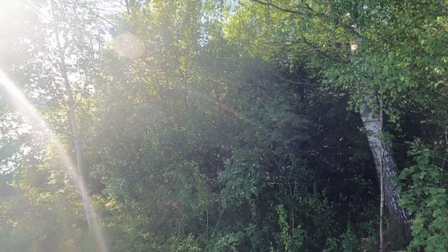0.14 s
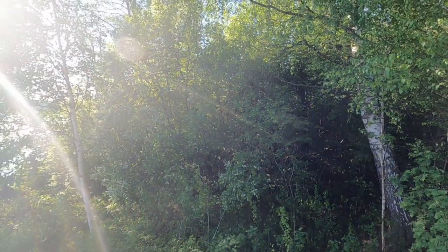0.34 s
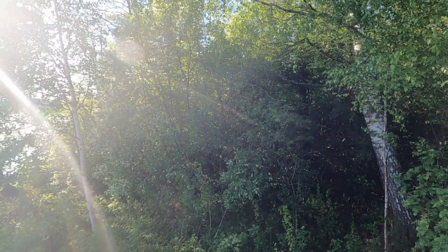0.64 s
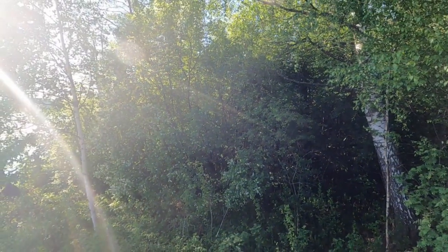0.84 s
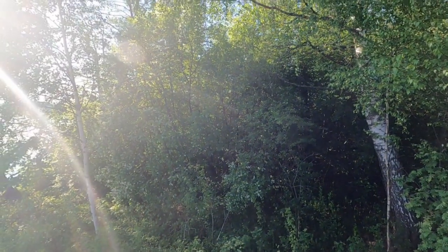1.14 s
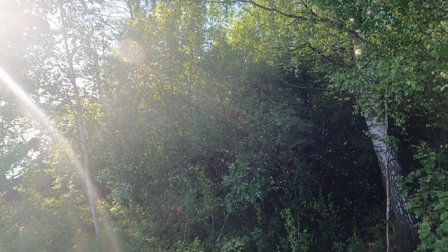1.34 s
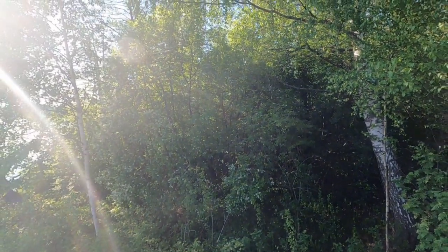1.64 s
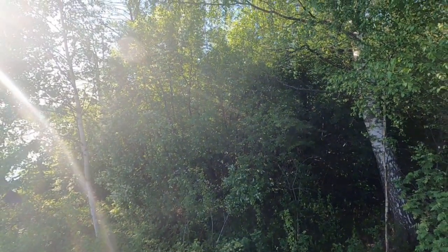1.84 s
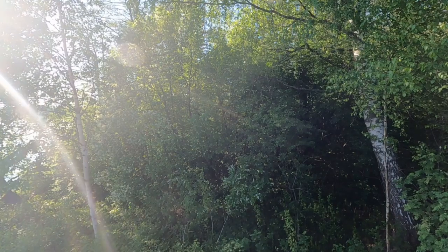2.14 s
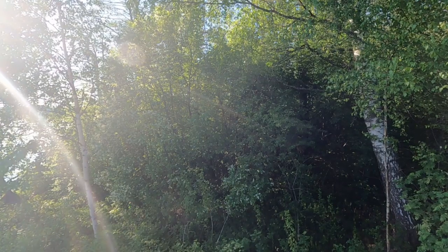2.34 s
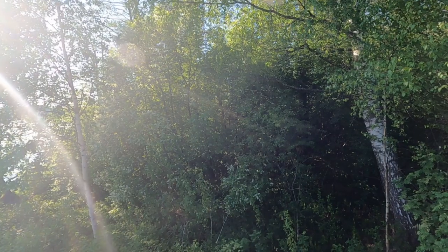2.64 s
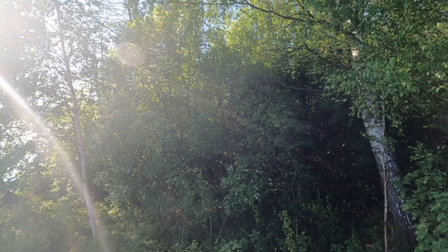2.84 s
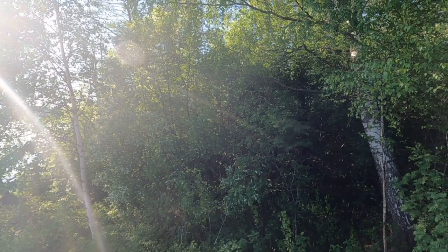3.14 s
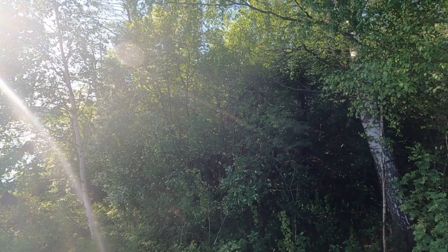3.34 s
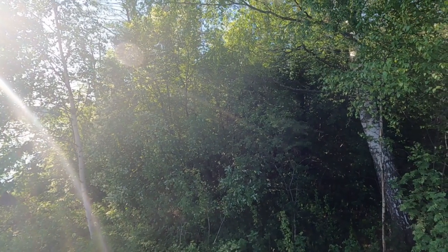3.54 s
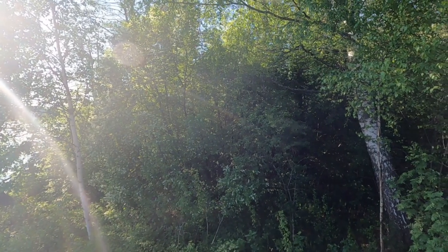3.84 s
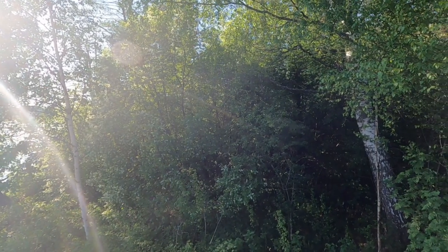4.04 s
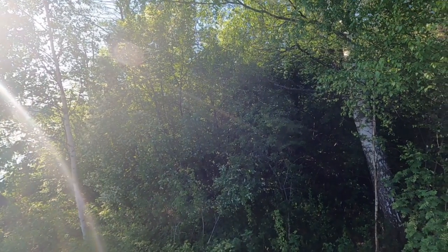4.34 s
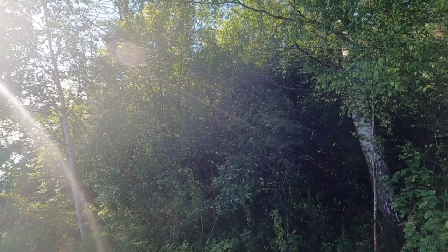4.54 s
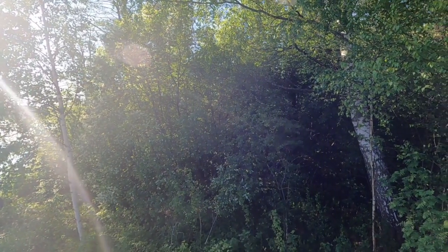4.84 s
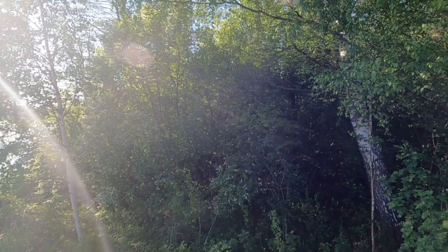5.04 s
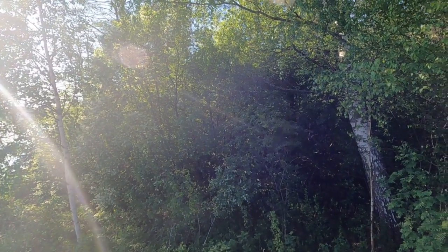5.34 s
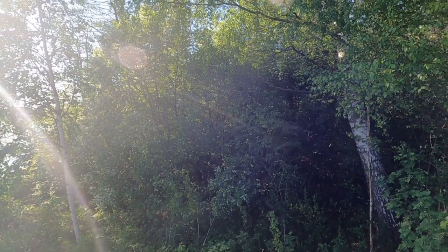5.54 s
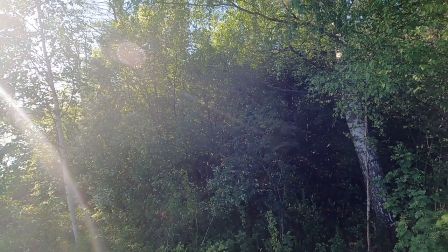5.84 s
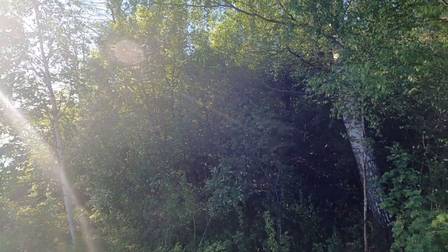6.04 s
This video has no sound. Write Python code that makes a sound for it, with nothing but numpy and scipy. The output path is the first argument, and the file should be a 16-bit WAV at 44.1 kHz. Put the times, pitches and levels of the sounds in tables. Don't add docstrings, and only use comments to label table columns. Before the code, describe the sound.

Very low, uneven handling noise shakes under delicate birdsong. After a brief clear whistle come small falling chips, rising notes and a run of falling syllables from birds far off among trees. Three rattling, buzzy trills stand out, widely spaced. Dull thumps cluster around the middle, then ease; mellow whistles finish over faint hiss. Mono, outdoors, birds distant and handling dry and close.

```python
import sys
import numpy as np
from scipy import signal
from scipy.io import wavfile
from scipy.ndimage import uniform_filter1d, map_coordinates

SR = 44100
rng = np.random.default_rng(int(sys.argv[2]) if len(sys.argv) > 2 else 0)


def gain_from_db(level_db):
    decades = np.asarray(level_db, float) / 20
    return 10 ** decades


def master(y):
    cut = np.clip(np.atleast_2d(y).T, -1, 1)
    pcm = np.round(cut * 32767)
    wavfile.write(sys.argv[1], SR, pcm.astype(np.int16))


N = 273420

# [f/Hz, width/Hz, level under steady rubbing/dB, level under a knock/dB]
BODY = [(31.14, 9.9, -0.4, -15.5), (54.13, 18, -3.5, 21.5), (77.77, 9.3, -3, 5.5), (117.9, 8.4, -10.5, 0),
        (153, 12.6, -19.5, -5), (204, 12.4, -14, -5.5), (238.8, 27.2, 8.5, -42.5), (278.3, 25, 0, -16)]


def evened(x):
    return x / np.sqrt(np.mean(x ** 2) + 1e-20)


def read(points, hz):
    f, value = np.transpose(points)
    return np.interp(np.log(hz + 1), np.log(f + 1), value)


def add(mix, s, sound):
    part = mix[round(s * SR):][:len(sound)]
    part += sound[:len(part)]


def tone(hz):
    return np.sqrt(2) * np.sin(2 * np.pi * np.cumsum(hz) / SR)


def resonate(x, hz, width):
    turn = np.exp(2j * np.pi * hz * np.arange(len(x)) / SR)
    r = np.exp(-np.pi * width / SR)
    smooth = signal.lfilter([1 - r], [1, -r], x / turn)
    smooth = signal.lfilter([1 - r], [1, -r], smooth)
    return 2 * (turn * smooth).real


def drift(s, length, hz):
    at = (s % 1 + np.arange(length) / SR) * hz
    return map_coordinates(rng.standard_normal(size=1000), [at], order=2, mode="wrap")


def steadied(x, hz):
    power = uniform_filter1d(x ** 2, size=round(SR / hz)) + 1e-12
    return evened(x / power ** 0.083)


def bumps(rows, t):
    return sum(np.outer(db, np.exp(-((t - at) / length) ** 2)) for at, length, *db in rows)


def hand():
    # [t/s, shake/dB, rubbing/dB]
    holding = [(0.03, -29, -40), (0.4, -26, -45), (0.7, -32, -49), (1.15, -29, -52.5), (1.6, -28, -45.5),
               (1.9, -29.5, -56.5), (2.25, -31, -57.5), (2.5, -27, -42), (2.85, -26, -41.5),
               (3.1, -24.5, -41.5), (3.35, -25, -50), (3.8, -37.5, -44.5), (4.1, -24.5, -46),
               (4.55, -31, -52.5), (5.2, -28.5, -78.5), (5.58, -31, -38.5), (5.92, -38.5, -66.5),
               (6.2, -56, -55.5)]
    # [t/s, length/s, sway/dB, rumble/dB]
    heaves = [(0.19, 0.13, 7, -2.5), (0.486, 0.081, 7, -2.5), (0.867, 0.14, 12.5, -8), (1.14, 0.16, 1.8, 6),
              (1.765, 0.084, -1, 5.5), (1.913, 0.097, 12, 4.5), (2.2, 0.035, 7, 16.5),
              (2.286, 0.088, 17.5, 9), (2.559, 0.1, 13, 8.5), (2.859, 0.054, 6, 4), (3.756, 0.067, 8, 18.5),
              (3.996, 0.043, 6.5, 2.5), (4.38, 0.072, 3.5, 3.5), (4.59, 0.051, 4.5, 5.5),
              (5.017, 0.14, 6, 10), (5.334, 0.096, 4.5, -4), (.3, .06, 2, -4), (1.447, 0.036, -0.5, -9),
              (2.41, 0.055, -3, -8), (3.26, 0.077, -0.5, -9), (4.8, .06, -3, 4.5), (5.94, 0.051, 2, -14)]
    # [t/s, length/s, rubbing/dB, creak/dB]
    grip = [(0.107, 0.098, -4, 1), (0.288, 0.038, 3.5, 6), (0.447, 0.047, -1, -7.5),
            (0.678, 0.044, -1, 7.5), (0.786, 0.044, 2, -8), (0.89, 0.046, 1.5, 2.5),
            (0.998, 0.071, -1.5, -6), (1.168, 0.032, 2, 1.5), (1.3, .05, -2.5, 1.5), (1.47, 0.04, -7, -3.5),
            (1.624, 0.057, -7.5, -1), (1.954, 0.038, -2, 14.5), (2.055, 0.044, -2, -7),
            (2.479, .05, -0.5, 11), (3.27, 0.031, -2, 3.5), (3.656, 0.051, -7, -6), (4.1, 0.047, -2.5, 2),
            (4.75, .1, -1, -11), (4.947, 0.087, -1, -8), (5.897, 0.053, -11, -2.5)]
    tremor_hz, wander_hz = 9.5, 2.5
    rumble_db, rumble_follows, calm_db = -35, 0.94, -26.5
    creak_db, settle_db_per_s, rest_db, creak_follows = -53.5, -10.5, -76, 0.15
    lean, lean_s = .02, .03

    t = np.arange(N) / SR
    s, *columns = np.transpose(holding)
    shake_db, rub_db = (np.interp(t, s, c) for c in columns)
    sway_db, heave_db = bumps(heaves, t)
    tight_db, grip_creak_db = bumps(grip, t)

    rumble_level = gain_from_db(rumble_db + rumble_follows * (shake_db - calm_db) + heave_db)
    rub_level = gain_from_db(rub_db + tight_db)
    settling = gain_from_db(creak_db + settle_db_per_s * t) + gain_from_db(rest_db)
    creak_level = settling * gain_from_db(creak_follows * (rub_db - rub_db.mean()) + grip_creak_db)

    rub = rng.standard_normal(N + SR) * gain_from_db(3.36 * drift(0, N + SR, hz=14))
    rings = [gain_from_db(db) * evened(resonate(rub, hz, 0.93 * width)[SR:]) for hz, width, db, _ in BODY]
    rumble, rubbing, creak = (steadied(sum(g), hz=3.4) for g in (rings[:2], rings[2:5], rings[5:]))

    sway = evened(np.tanh(0.58 * tone(tremor_hz + wander_hz * drift(0, N, hz=6.0))))
    swaying = gain_from_db(shake_db + sway_db) * sway + lean * np.exp(-t / lean_s)
    return swaying + rumble_level * rumble + rub_level * rubbing + creak_level * creak


def knocks():
    # [t/s, peak/dB, deep part/dB, middle part/dB]
    muffled = [(0.783, -40, 14.5, 0), (0.899, -37.5, -16, -7), (2.126, -41.5, 21, 17.5),
               (2.207, -37.5, 12.5, 14.5), (2.307, -45.5, 8.5, -8), (2.492, -37.5, 10, 13.5),
               (2.631, -36, 1, -9), (2.919, -42, 2, 9), (3.193, -24.5, -5.5, 0), (3.322, -29, 4, -8),
               (3.386, -34, -9, 9), (3.444, -27.5, -8, -1), (3.577, -23, -3, 2.5), (3.748, -34.5, 7.5, 0),
               (3.927, -16, -10.5, -18.5), (4.205, -34.5, -13, -3), (4.321, -19.5, -5, -5.5),
               (5.549, -24.5, -3.5, -7), (5.58, -31.5, 5, 1), (6.008, -36, -4.5, -12)]
    # [t/s, peak/dB, deep part/dB, middle part/dB]
    taps = [
        (0.38, -36, -42, -32),
        (1.077, -46, 9, 18.5),
        (1.188, -40, 4.5, 10.5),
        (1.319, -49.5, 8, -9),
        (1.727, -26.5, -3, 13.5),
        (1.956, -46, 21, -5),
        (2.442, -40.5, -2, -4),
        (2.802, -45.5, 7, 5),
        (3.023, -33, 10.5, 3),
        (5.519, -35, -13, 7),
    ]
    # [f/Hz, width/Hz, level/dB]
    shell = [(204.6, 14, -22), (248, 37, -37.5), (330, 41, -36.5), (420, 74, -39.5)]
    upper_db, tap_upper_db = -21, -14.5

    out = np.zeros(N)
    blows = [(*row, upper_db) for row in muffled] + [(*row, tap_upper_db) for row in taps]
    hz, width, _, ring_db = np.transpose(BODY)[:, :, None]
    t = np.maximum(np.arange(SR // 2) / SR - 0.545 / hz, 0)
    detune = 1 + 0.059 * rng.standard_normal((len(blows), len(BODY), 1))
    decay = np.exp(-np.pi * 2.2 * width * t) + 0.21 * np.exp(-np.pi * .8 * width * t)
    swell = (1 - np.exp(-t * hz / 0.39)) ** 2 * decay

    u = np.arange(4000) / SR
    snap = np.zeros(len(u))
    for f, w, db in shell:
        snap += gain_from_db(db + 11.5) * np.exp(-np.pi * w * u) * np.sin(2 * np.pi * f * u)
    snap *= 1 - np.exp(-u / 0.0027)

    for (s, db, deep_db, middle_db, top_db), tune in zip(blows, detune):
        colour = [(50, deep_db - 3.5), (80, middle_db), (115, 0.013), (160, 0.0069), (230, top_db + 10)]
        rings = gain_from_db(ring_db + read(colour, hz)) * swell * np.sin(2 * np.pi * hz * tune * t)
        add(out, s - .009, gain_from_db(db - 1.5) * rings.sum(0))
        add(out, s - .008, gain_from_db(db + 0.33 * top_db) * snap)
    return out


def whistle():
    # [t/s, f/Hz, level/dB]
    track = [
        (0.01, 1830, -68),
        (.022, 1900, -57),
        (0.049, 1930, -41),
        (.075, 1912, -39),
        (.097, 1943, -40),
        (0.106, 2005, -48),
        (0.118, 2080, -54.5),
        (0.127, 1943, -44),
        (0.144, 1950, -62),
    ]
    octave_db, echo_db = -42.5, -14
    s, hz, db = np.transpose(track)
    t = np.arange(s[0], s[-1], 1 / SR)
    hz = np.interp(t, s, hz)
    level = np.minimum((s[-1] - t) / .006, 1) * gain_from_db(np.interp(t, s, db))
    return s[0], level * (tone(hz) + gain_from_db(octave_db) * tone(2 * hz)), echo_db


def trill(s, centre_hz, swing_hz, db, accent_db):
    length_s, stop_s, echo_db = .164, .016, -11.5
    top_s, turn_s, slowing_s = .042, .0184, .0008
    accent_s, accent_hz_per_db = .149, 35
    beak_hz, beak_width_hz = 3600, 750

    t = np.arange(0, length_s, 1 / SR)
    k = np.arange(8)
    later_tops = top_s + turn_s * k + slowing_s * k * (k - 1)
    tops = [0, .026, top_s - .22 * turn_s, *later_tops]
    turns = np.interp(t, tops, [0, .25, .78, *(k + 1)])
    saw = uniform_filter1d(signal.sawtooth(2 * np.pi * turns + np.pi * .44, .22), size=70)

    opening = np.clip((t - .01) / 0.071, .3, 1)
    waver = drift(s, len(t), hz=60.23)
    accent = accent_db * np.exp(-((t - accent_s) / .007) ** 2)
    swell = np.clip(t / 0.058, 0, 1) ** 1.02 * np.clip((length_s - t) / stop_s, 0, 1)
    swell = swell * (1 + 0.22 * saw) * gain_from_db(1.54 * waver + accent)
    pitch = centre_hz * (1 - 0.096 * t + .012 * waver) + swing_hz * opening * saw + accent_hz_per_db * accent
    beak = np.exp(-((pitch - beak_hz) / beak_width_hz) ** 2)
    return s, gain_from_db(db + 1.5) * swell * beak * tone(pitch), echo_db


def trills():
    # [t/s, centre f/Hz, swing/Hz, level/dB, last turn/dB]
    rows = [
        (2.806, 3390, 432, -59.5, -2.5),
        (4.189, 3400, 467, -55.5, 4.5),
        (5.655, 3320, 416, -51.5, -6.5),
    ]
    return [trill(*row) for row in rows]


def note(s, length, from_hz, to_hz, db, echo_db):
    t = np.arange(0, length, 1 / SR)
    flutter = gain_from_db(1.6 * drift(s, len(t), hz=90))
    hz = np.linspace(from_hz, to_hz, len(t)) * (1 + 0.004 * drift(s, len(t), hz=118.1))
    return s, flutter * gain_from_db(db) * signal.windows.tukey(len(t), .4) * tone(hz), echo_db


def syllables():
    # [t of clear part/s, upper level/dB, clear level/dB]
    falls = [
        (2.765, -70, -71),
        (3.069, -71, -72.5),
        (3.219, -75, -73.5),
        (3.379, -73.5, -73),
        (3.49, -77, -76),
        (3.667, -75, -76),
        (3.838, -77, -75),
        (3.997, -89, -79.5),
        (4.178, -80, -80),
    ]
    # [t/s, level/dB]
    rising = [
        (1.614, -71),
        (1.724, -68),
        (1.839, -68),
    ]
    # [t/s, level/dB, drop to f/Hz]
    holds = [
        (1.942, -68, 3650),
        (2.068, -67.5, 3630),
        (2.2, -67.5, 3400),
    ]
    # [t/s, from f/Hz, to f/Hz, level/dB]
    scoops = [
        (2.334, 3530, 4030, -72),
        (2.544, 3280, 4040, -71.5),
    ]
    # [t/s, level/dB]
    flicking = [
        (3.163, -71.5),
        (3.313, -73.5),
    ]
    chip_beats = [0, 1, 2, 3, 4, 6, 7]
    chip_s, chip_gap_s = 1.363, .1665
    hold_s, hold_hz, drop_s, hold_echo_db = .057, 4140, 0.018, 1
    dip_s, dip_hz, climb_s, scoop_echo_db = .045, 3130, 0.052, -2.5

    upper = [(s - .032, .038, 4400, 3150, db - 4, 6) for s, db, _ in falls]
    clear = [(s, .032, 3150, 2600, db + 1.5, -8) for s, _, db in falls]
    rises = [(s, .039, 3870, 4720, db - 1, 1) for s, db in rising]
    held = [(s, hold_s, hold_hz, hold_hz, db, hold_echo_db) for s, db, _ in holds]
    drops = [(s + hold_s, drop_s, hold_hz, hz, db, hold_echo_db) for s, db, hz in holds]
    dips = [(s, dip_s, hz, dip_hz, db, scoop_echo_db - 7.5) for s, hz, _, db in scoops]
    climbs = [(s + dip_s, climb_s, dip_hz, hz, db, scoop_echo_db + 6.0) for s, _, hz, db in scoops]
    flicks = [(s, .018, 2700, 3100, db, -.7) for s, db in flicking]
    chips = [(chip_s + beat * chip_gap_s, .017, 2550, 1400, -73.5, -8) for beat in chip_beats]
    return upper + clear + rises + held + drops + dips + climbs + flicks + chips


def glides():
    # [t/s, length/s, from f/Hz, to f/Hz, level/dB]
    song = [(.12, 0.21, 4220, 3840, -88), (0.25, 0.058, 2230, 2300, -76), (.535, 0.037, 3900, 4050, -83),
            (0.685, 0.12, 3370, 3920, -81), (0.965, 0.083, 3680, 3430, -81), (1.049, .125, 3470, 2680, -88),
            (1.222, 0.021, 4430, 4700, -75.5), (1.482, 0.056, 5060, 4330, -73),
            (1.58, 0.037, 2700, 3050, -90), (2.59, 0.032, 2160, 2350, -77.5),
            (3.531, 0.059, 3870, 3870, -72.5), (3.873, 0.027, 2750, 4680, -89),
            (3.972, 0.024, 3290, 3160, -76), (4.635, .045, 3350, 3200, -89),
            (5.018, 0.036, 4400, 3660, -89)]
    # [t/s, length/s, from f/Hz, to f/Hz, level/dB]
    whistler = [
        (4.775, 0.12, 2210, 2075, -80.5),
        (4.968, 0.18, 2840, 2890, -75),
        (5.288, 0.062, 2990, 3060, -75),
        (5.421, 0.023, 3080, 2530, -71),
        (5.52, 0.11, 2620, 2490, -75.5),
        (5.46, 0.066, 2250, 2550, -78.5),
        (5.885, 0.07, 2200, 2470, -79.5),
        (5.95, 0.045, 2510, 3230, -75.5),
        (5.991, 0.034, 3210, 3130, -70.5),
        (6.108, 0.046, 3300, 4120, -69),
    ]
    # [t/s, length/s, from f/Hz, to f/Hz, level/dB]
    flourish = [
        (5.183, 0.055, 3600, 4800, -72.5),
        (5.208, .022, 4700, 5000, -80),
        (5.232, 0.078, 4800, 4780, -78.5),
        (5.272, 0.022, 3200, 2980, -72.5),
        (3.464, 0.023, 5650, 5200, -74.5),
    ]
    # [t/s, length/s, from f/Hz, to f/Hz, level/dB]
    seeps = [
        (2.712, 0.026, 4820, 4340, -78),
        (3.058, 0.026, 4780, 4900, -77),
        (3.717, 0.049, 4640, 4900, -76),
        (3.899, 0.028, 4730, 4980, -75),
        (4.065, 0.042, 4990, 3890, -75),
    ]
    # [t/s, length/s, f/Hz, level/dB]
    low_song = [(1.51, 0.035, 1980, -85.5), (1.79, 0.036, 2420, -82), (2.177, 0.11, 1987, -78),
                (2.81, 0.049, 1434, -77.5), (2.861, 0.063, 1980, -80), (3.04, 0.031, 1612, -78),
                (3.216, 0.12, 1583, -89), (3.685, 0.13, 1464, -77), (3.9, 0.066, 1490, -82.5),
                (4.26, 0.061, 1488, -81.5), (4.475, 0.057, 1037, -77)]
    sag = 0.0093
    hoots = [(s, length, hz * (1 + sag), hz * (1 - sag), db) for s, length, hz, db in low_song]
    singers = [(song, -1), (whistler, 1.5), (flourish, 5.5), (seeps, 3.5), (hoots, -1)]
    return [(*row, echo_db) for rows, echo_db in singers for row in rows]


def twitter(s, length, hz, width, db):
    size = round(length * SR)
    grains = rng.standard_normal(size=SR)[:size] * gain_from_db(2.1 * drift(s, size, hz=113.7))
    cloud = evened(resonate(grains, hz, width))
    return s, gain_from_db(db) * cloud * signal.windows.tukey(size, .5), 0.


def twitters():
    # [t/s, length/s, centre f/Hz, width/Hz, level/dB]
    rows = [(0.305, 0.016, 4860, 4020, -68.5), (0.468, 0.052, 5010, 2030, -76),
            (0.76, 0.063, 6460, 1404, -76), (0.806, 0.15, 5500, 1500, -78.5),
            (1.32, 0.073, 5660, 2400, -72.5), (1.351, 0.24, 9350, 3000, -90),
            (1.615, 0.16, 6200, 910, -82.5), (1.752, 0.037, 5240, 1290, -75),
            (2.136, 0.023, 6160, 1500, -70.5), (2.171, 0.084, 1545, 1500, -73.5),
            (2.132, 0.085, 6020, 1315, -83), (2.493, 0.043, 1190, 890, -73.5),
            (2.799, 0.13, 6500, 1100, -82.5), (3.459, 0.063, 5020, 900, -71),
            (3.496, 0.096, 4460, 500, -69), (4.27, 0.11, 5540, 1200, -82.5), (4.381, 0.056, 6800, 900, -79),
            (4.465, 0.022, 5900, 500, -79), (5.22, 0.15, 4040, 895, -78.5)]
    return [twitter(*row) for row in rows]


def twig():
    # [f/Hz, level/dB]
    rings = [(1400, -9), (2000, -11), (2350, 5.5), (3600, 2.5), (4400, 4), (5600, -13), (7000, -16)]
    snap_s, snap_db, t60_s, echo_db = .305, -57.5, 0.015, -4
    t = np.arange(600) / SR
    snap = sum(gain_from_db(db - 60 * t / t60_s) * np.sin(2 * np.pi * hz * t) for hz, db in rings)
    return snap_s, gain_from_db(snap_db) * snap, echo_db


def wood(x):
    # [f/Hz, t60/s]
    t60 = [(1000, 1), (2000, 0.82), (4000, 0.61), (8000, 1)]
    # [delay/s, level/dB]
    early = [(.0045, -10), (0.012, -4), (.019, -15), (.029, -9.5)]
    taps = np.zeros(SR)
    at = np.arange(300, SR - 20, 20) + rng.integers(0, 20, (SR - 301) // 20)
    taps[at] = rng.choice([-1., 1.], len(at))
    hz, t, z = signal.stft(taps, SR, nperseg=256)
    tail = signal.istft(z * gain_from_db(-60 * t / read(t60, hz)[:, None]), SR, nperseg=256)[1]
    tail = tail / np.linalg.norm(tail)
    for s, db in early:
        add(tail, s, gain_from_db([db]))
    return signal.fftconvolve(x, tail)[:N]


def air():
    # [f/Hz, level per Hz/dB]
    colour = [(230, -18), (273, -0.5), (768, -9.5), (1510, -14), (1700, -16), (3890, -19.5), (5400, -24),
              (12600, -30.5)]
    # [t/s, level over the air/dB]
    chorus_track = [
        (0.0, -19.5),
        (0.65, -16),
        (1.33, -8.5),
        (1.67, -5.5),
        (2.35, -17.5),
        (2.81, -1),
        (3.45, -7),
        (5.49, -16),
        (6.2, -13),
    ]
    air_db, fade_db_per_s = -72, -0.4553

    frames, hz = N // 128 + 5, np.fft.rfftfreq(512, 1 / SR)[:, None]
    t = np.arange(frames) * 128 / SR
    a, b, patches = rng.standard_normal((frames, 257, 3)).T
    patches = uniform_filter1d(patches, size=5, axis=0)
    patches = evened(uniform_filter1d(patches, size=14, axis=1))
    db = air_db + fade_db_per_s * t
    chorus_db = np.interp(t, *np.transpose(chorus_track))
    chorus = gain_from_db(chorus_db + 5.9 * patches) * np.exp(-(np.log((hz + 1) / 4200) / 0.35) ** 2)
    level = gain_from_db(read(colour, hz) + 1.0 * patches + db - db.mean())
    z = (a + 1j * b) * level * (1 + chorus) * (hz > 200)
    hiss = signal.istft(z, nperseg=512, noverlap=384)[1][:N]
    band = signal.sosfilt(signal.butter(4, [400, 1000], "bandpass", fs=SR, output="sos"), hiss)
    return hiss * gain_from_db(db.mean() + 0.5) / band.std()


def scene():
    direct, echo = np.zeros(N), np.zeros(N)
    notes = [note(*row) for row in glides() + syllables()]
    for s, sound, echo_db in [whistle(), *trills(), *notes, *twitters(), twig()]:
        add(direct, s, sound)
        add(echo, s, gain_from_db(echo_db) * sound)
    return (hand() + knocks() + direct + wood(echo) + air())[None]


def top_cut(x):
    return signal.sosfilt(signal.butter(12, 15630, fs=SR, output="sos"), x)


def record(dry):
    return top_cut(dry)


dry = scene()
out = record(dry)
master(out)
```